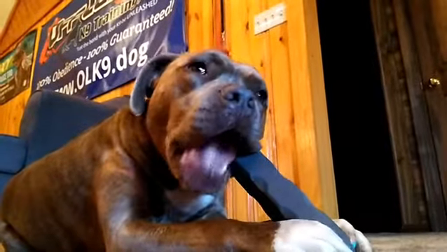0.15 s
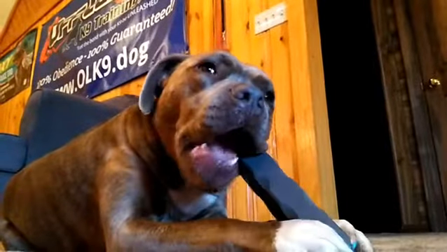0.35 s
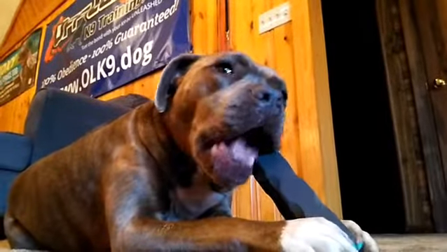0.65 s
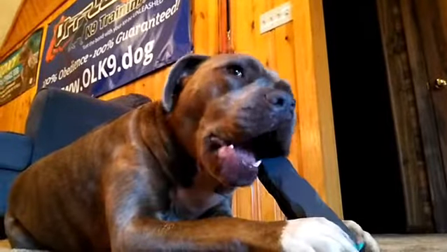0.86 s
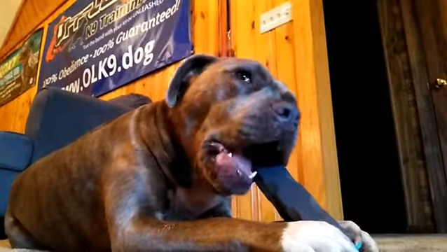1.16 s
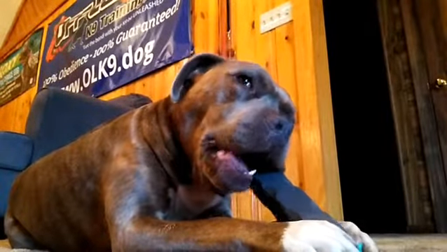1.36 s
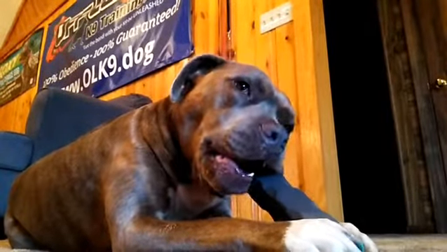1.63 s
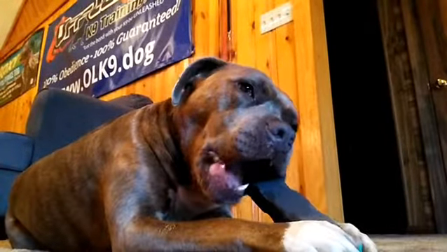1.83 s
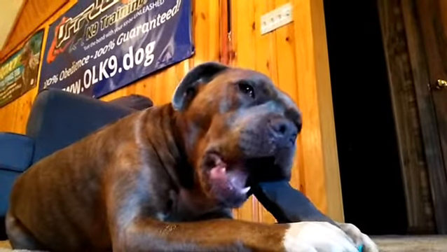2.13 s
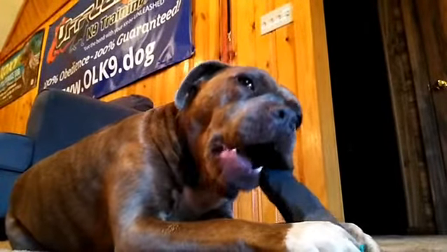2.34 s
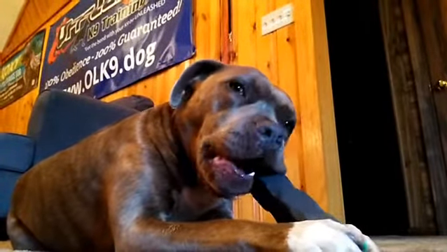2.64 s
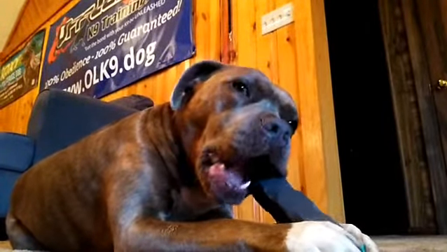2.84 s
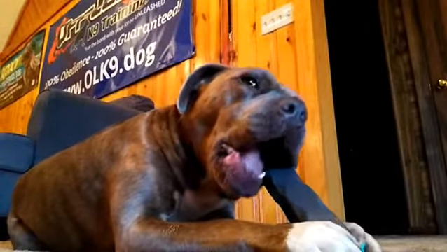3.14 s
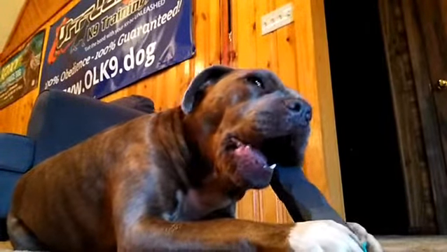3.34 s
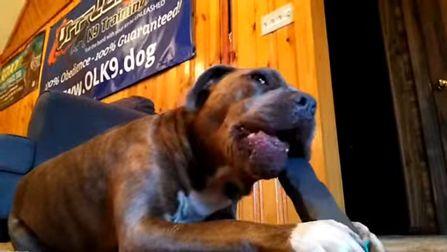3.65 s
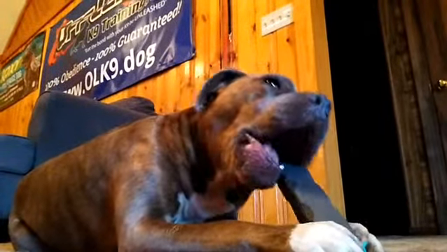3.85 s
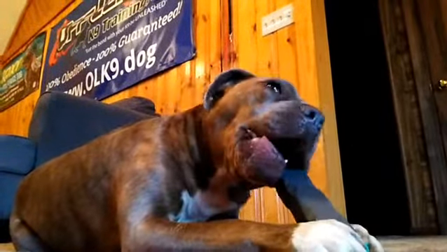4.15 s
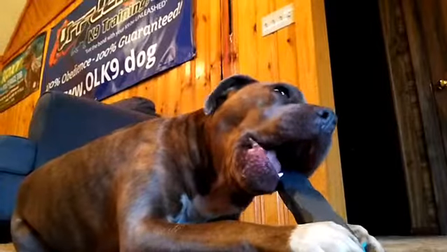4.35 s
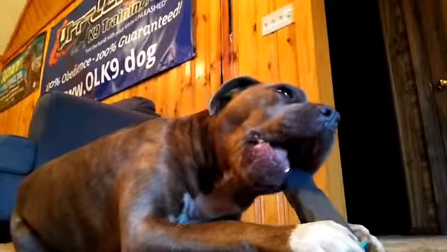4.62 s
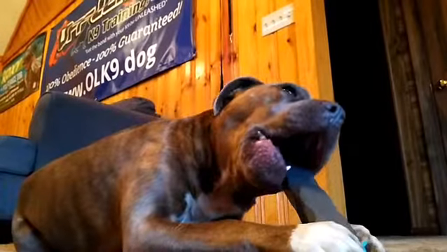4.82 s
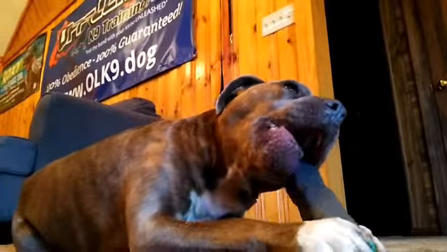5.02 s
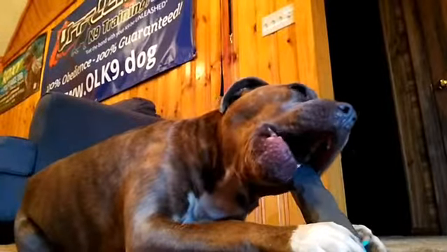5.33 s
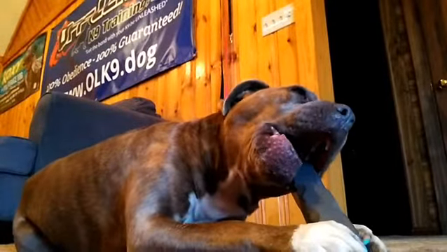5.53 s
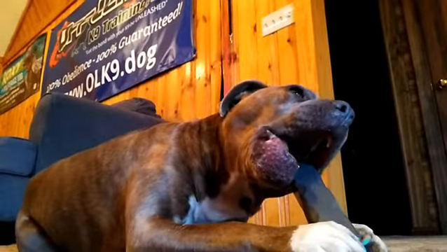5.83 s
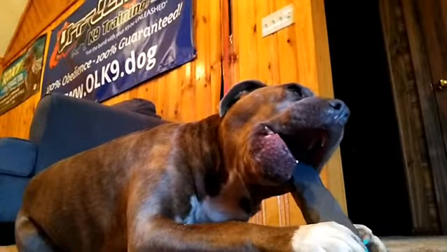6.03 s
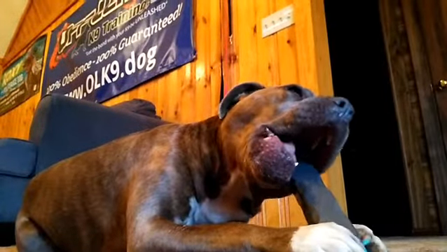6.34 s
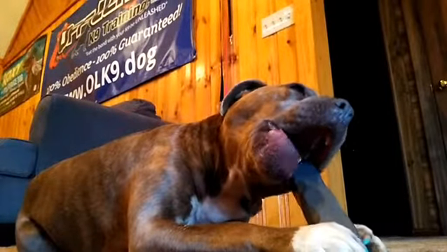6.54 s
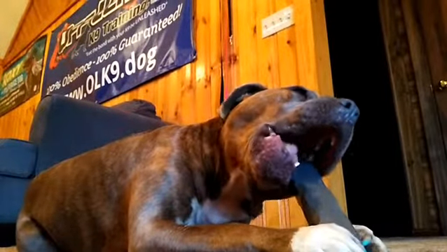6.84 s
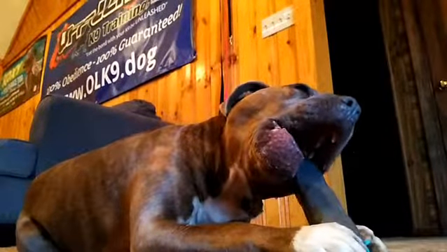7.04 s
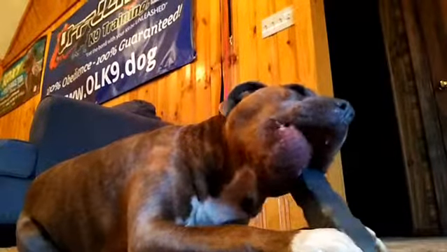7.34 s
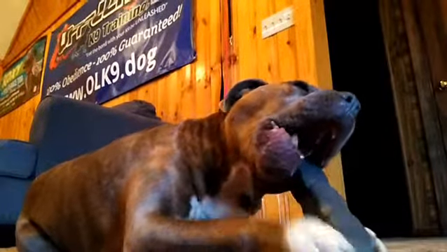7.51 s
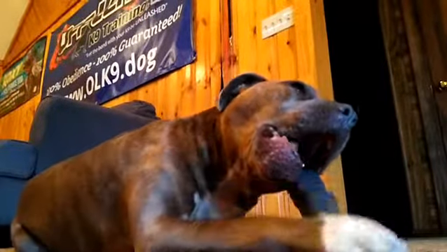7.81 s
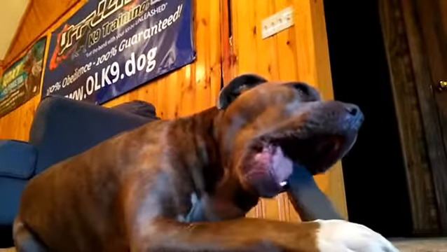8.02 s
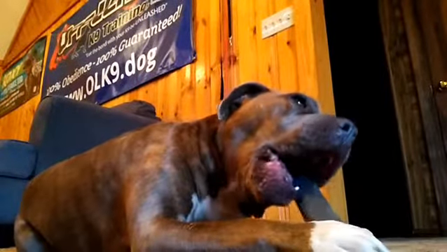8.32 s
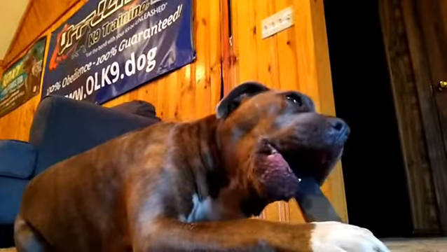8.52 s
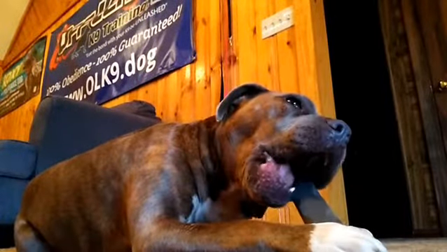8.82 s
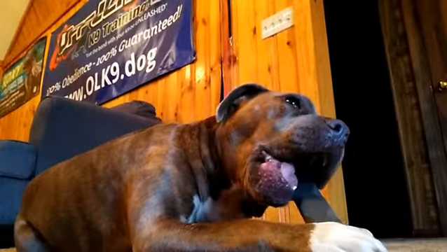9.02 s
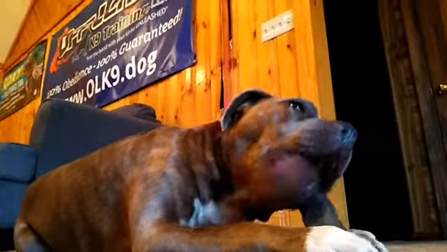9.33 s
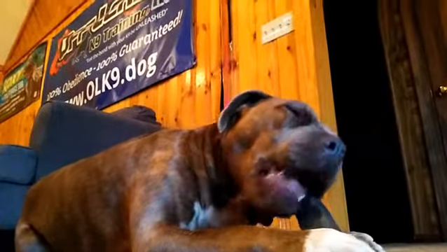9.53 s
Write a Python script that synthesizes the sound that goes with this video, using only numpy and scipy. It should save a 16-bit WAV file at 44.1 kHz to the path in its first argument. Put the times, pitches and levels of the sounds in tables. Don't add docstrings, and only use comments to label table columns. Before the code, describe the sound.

A dog gnaws a hard chew toy up close, teeth clacking, knocking and scraping in irregular bursts over a faint low appliance hum.

```python
import sys
import numpy as np
from scipy import signal
from scipy.fft import rfft, irfft, next_fast_len
from scipy.io import wavfile
from scipy.ndimage import uniform_filter1d

SR = 44100
rng = np.random.default_rng(int(sys.argv[2]) if len(sys.argv) > 2 else 0)


def wav_out(sig):
    wavfile.write(sys.argv[1], SR, np.round(np.clip(np.atleast_2d(sig).T, -1, 1) * 32767).astype(np.int16))


def field_ratio(decibels):
    return 10 ** (np.asarray(decibels, dtype=float) / 20)


N = 426447

PORT_LAG_SAMPLES = 4
TONGUE_PAN_DB = 16.5

# [hz, level_db, t60_s]
CRACK_MODES = [(2950, -6, 0.0031), (3520, 9.5, 0.0062), (3940, -29, 0.0032), (5300, 0, 0.0052),
               (6800, -6, 0.0023)]
# [start_s, level_db]
LIP_TICKS = [(0.4218, -53), (0.625, -52), (1.713, -55), (2.39, -65), (3.336, -55), (3.4092, -55),
             (3.47, -53), (3.6866, -54), (4.3, -56), (4.7885, -47), (4.878, -52), (5.1754, -51.5),
             (5.2869, -56), (5.497, -56), (5.610, -56), (5.84, -53), (6.1843, -64), (6.2464, -56),
             (8.937, -59), (8.995, -59), (9.0998, -52), (9.2767, -59), (9.531, -55), (9.568, -52)]
# [start_s, level_db]
TONGUE_TICKS = [(0.8021, -63), (1.1184, -62), (1.1643, -58), (2.077, -61), (2.3, -54), (2.9654, -61),
                (3.5723, -57), (3.8222, -68), (3.94, -52), (4.114, -54), (4.2752, -61), (5.202, -57),
                (5.3408, -63), (5.415, -55.5), (5.7179, -61), (8.2544, -65), (9.0648, -60), (9.1441, -60)]


def evened(x):
    return x / np.sqrt(np.mean(x ** 2) + 1e-20)


def peak(x):
    return x / (abs(x).max() + 1e-20)


def read(points, hz):
    f, value = np.transpose(points)
    return np.interp(np.log(hz + 1), np.log(f + 1), value)


def smoothed(x, first, second, **axes):
    return uniform_filter1d(uniform_filter1d(x, size=first, **axes), size=second, **axes)


def add(mix, start_s, sound):
    part = mix[:, round(start_s * SR):][:, :sound.shape[1]]
    part += sound[:, :part.shape[1]]


def band_noise(hz, width_hz, channels):
    n = next_fast_len(N)
    bell = 1 / (1 + (2 * (np.fft.rfftfreq(n, 1 / SR) - hz) / width_hz) ** 2)
    return evened(irfft(rfft(rng.standard_normal((channels, n))) * bell, n)[:, :N])


def ring(modes, t, rise_s):
    spot_db, detune = 2.2, 0.022
    total = np.zeros(len(t))
    for hz, level_db, t60_s in modes:
        a, b = rng.standard_normal(2)
        decay = field_ratio(level_db + spot_db * a - 60 * t / t60_s)
        total += decay * np.sin(2 * np.pi * hz * (1 + detune * b) * t)
    return peak(total * (1 - np.exp(-t / rise_s)) ** 2)


def hum():
    # [hz, width_hz, level_db]
    whine = [(58.5, 24, -56.5), (75.7, 17, -58.5), (251.3, 39, -69.5), (568, 110, -72), (818, 19, -66),
             (840, 160, -75.5)]
    motor_hz, motor_db = 58.74, -48.7
    side_hz, side_db = (41.26, 46.0, 53.6), (-68, -66, -59.5)
    mains_hz, mains_db = 120.0 * np.arange(1, 3), (-58, -69)
    blade_hz, blade_db = 273.1 * np.arange(1, 4), (-67, -69.5, -71.5)
    tone_hz = [motor_hz, *side_hz, *mains_hz, *blade_hz]
    level = field_ratio(np.array([motor_db, *side_db, *mains_db, *blade_db]))
    t = (np.arange(N) - np.array([[PORT_LAG_SAMPLES], [0]])) / SR
    tones = sum(np.sqrt(2) * a * np.sin(2 * np.pi * (f * t + rng.random())) for f, a in zip(tone_hz, level))
    lines = sum(field_ratio(db) * band_noise(hz, width_hz, channels=1) for hz, width_hz, db in whine)
    return tones * field_ratio([[-0.3], [0.3]]) + lines * field_ratio([[0.6], [-0.6]])


def air():
    # [hz, level_db_per_hz]
    air_spectrum = [(15, -50), (25, -29), (66, 0.5), (133, -14), (173, -16), (260, -14.5), (445, -20),
                    (552, -21), (703, -25), (826, -28.5), (895, -25), (1080, -35), (2170, -39.5),
                    (4750, -53.5), (15500, -61)]
    # [hz, likeness_0_to_1]
    likeness = [(60, 0.98), (300, 0.86), (800, 0.043), (1500, 0.026), (3000, 0.16), (6000, 0.013)]
    # [time_s, level_db]
    swell = [(0, 0), (1, 3), (1.8, 4), (2.6, 2.5), (4, 2), (4.8, -2), (5.9, 2), (7, -0.5), (8, -1.5),
             (9.67, 0.5)]
    frames, hz = N // 512 + 5, np.fft.rfftfreq(2048, 1 / SR)
    column_hz = hz[:, None]
    a, b, c, d, patches = rng.standard_normal((frames, 1025, 5)).T
    patches = evened(uniform_filter1d(uniform_filter1d(patches, size=20, axis=0), size=8, axis=1))
    same = np.clip(read(likeness, hz), -1, 1)[:, None]
    left, other = a + 1j * b, c + 1j * d
    z = np.array([left, same * left + np.sqrt(1 - same ** 2) * other])
    z *= field_ratio(read(air_spectrum, hz)[:, None] + 3.08 * patches / (1 + column_hz / 2500))
    low = 1 / (1 + (column_hz / 1500.0) ** 2)
    lumps = evened(smoothed(rng.standard_normal(frames), 8, 8))
    swell_db = np.interp(np.arange(frames) * 512 / SR, *np.transpose(swell))
    z *= field_ratio(low * (swell_db + 0.31 * lumps))
    z[0] *= np.exp(-2j * np.pi * low * column_hz * PORT_LAG_SAMPLES / SR)
    return field_ratio(-49) * evened(signal.istft(z, nperseg=2048, noverlap=1536)[1][:, :N])


def rustle():
    # [start_s, length_s, level_db]
    strokes = [(0.02, 0.26, -74.5), (0.115, 0.051, -77), (0.28, 0.065, -79), (0.383, 0.24, -70),
               (0.63, 0.065, -69), (0.875, 0.053, -80), (1.579, .02, -79), (1.691, 0.064, -78),
               (1.855, 0.048, -78), (2.384, 0.064, -68), (3.003, 0.09, -83), (3.451, 0.066, -73),
               (3.51, 0.064, -80), (3.632, 0.029, -83), (3.939, 0.038, -70), (3.998, 0.055, -82),
               (4.409, 0.022, -87), (4.88, 0.047, -68), (5.28, 0.032, -77), (5.714, 0.1, -76.5),
               (5.814, 0.053, -71), (6.175, 0.064, -82), (7.03, 0.075, -82), (7.173, 0.072, -76),
               (8.92, 0.11, -87), (9.093, 0.029, -65), (9.632, 0.058, -84)]
    # [hz, width_hz, level_db]
    hiss_bands = [(6000, 560, -10), (9600, 5700, 3.5), (13700, 3200, -8)]
    fizz_s, fizz_db = 0.1, -31.5
    grain = field_ratio(2.8 * evened(uniform_filter1d(rng.standard_normal(N), size=200)))
    pops = rng.exponential(1, N) * (rng.random(N) < 320 / SR)
    crackle = uniform_filter1d(pops, size=24) * 24
    hiss = sum(field_ratio(db) * band_noise(hz, width_hz, channels=2) for hz, width_hz, db in hiss_bands)
    envelope = np.full((1, N), field_ratio(-88.5))
    for start_s, length_s, level_db in strokes:
        add(envelope, start_s, field_ratio(level_db) * signal.windows.tukey(round(length_s * SR), 0.35)[None])
    fizz = np.exp(-np.arange(SR // 5) / (fizz_s * SR))[None]
    for start_s, level_db in LIP_TICKS + TONGUE_TICKS:
        add(envelope, start_s, field_ratio(level_db + fizz_db) * fizz)
    rub = evened(hiss * grain * (1 + 0.6 * crackle))
    return rub * envelope * field_ratio([[0.3], [-16.0]])


def ticks():
    # [start_s, level_db]
    splinters = [(0.3591, -59), (2.8489, -57), (4.0881, -55), (4.9292, -49), (6.5318, -48), (6.997, -66),
                 (7.1586, -41), (7.4826, -59), (7.6324, -49.5), (8.1035, -62), (8.3905, -46.5),
                 (8.8393, -61), (9.0409, -52), (9.324, -49)]
    # [start_s, level_db]
    further_tongue_ticks = [(.0588, -58), (.3032, -62), (.4125, -59), (1.8696, -63), (3.0515, -62), (3.3947, -58),
                            (3.5458, -65), (3.6416, -62), (4.0168, -61), (5.1452, -65), (5.617, -58), (5.688, -64),
                            (5.7324, -65), (5.8875, -66), (6.4308, -62), (8.975, -63), (9.013, -61), (9.186, -63),
                            (9.3861, -66), (9.6415, -60), (9.663, -53.5)]
    out, t = np.zeros((2, N)), np.arange(400) / SR
    bright = signal.butter(N=2, Wn=[6300, 14000], btype="band", fs=SR, output="sos")
    places = [(LIP_TICKS, 18), (TONGUE_TICKS, TONGUE_PAN_DB), (splinters, -3), (further_tongue_ticks, TONGUE_PAN_DB)]
    for rows, pan_db in places:
        port_db = np.array([[0.4], [-0.6]]) * pan_db
        for start_s, level_db in rows:
            snap = signal.sosfilt(bright, rng.standard_normal((2, len(t))) * np.exp(-t / 0.0013))
            add(out, start_s, field_ratio(level_db - 3.0 + port_db) * snap / abs(snap).max())
    return out


def puffs():
    # [start_s, length_s, hz, level_db]
    nose_puffs = [
        (0.298, 0.13, 6540, -82),
        (1.868, 0.14, 5800, -79),
        (2.368, 0.17, 5100, -74.5),
        (3, .03, 6530, -82),
        (5.133, 0.1, 7000, -84),
        (5.837, 0.054, 5900, -79),
        (6.993, 0.082, 7800, -71),
        (7.473, 0.14, 6800, -79),
        (8.096, 0.06, 6370, -79),
        (9.085, 0.087, 6400, -77),
    ]
    out = np.zeros((2, N))
    for start_s, length_s, hz, level_db in nose_puffs:
        u = np.arange(round(length_s * SR)) / (length_s * SR)
        band = signal.butter(N=3, Wn=[hz * 0.81, hz * 1.15], btype="band", fs=SR, output="sos")
        breath = evened(signal.sosfilt(band, rng.standard_normal((2, 8000))))[:, :len(u)]
        add(out, start_s, field_ratio(level_db + np.array([[-1.5], [5.0]])) * breath * peak(u * np.exp(-u / 0.13)))
    return out


def rings():
    # [start_s, level_db, pitch_hz]
    hollow_knocks = [(0.3274, -49, 520), (0.4282, -40.5, 303), (0.8004, -44, 422), (0.8872, -40, 340),
                     (0.8877, -49, 635), (1.18, -41.5, 430), (1.3601, -46.5, 630), (1.6794, -49, 500),
                     (1.9098, -53, 432), (2.2166, -45, 540), (3.2044, -41.5, 390), (3.2593, -44, 580),
                     (3.4598, -29.5, 540), (3.4778, -43, 384), (3.7891, -46.5, 540), (3.8499, -38.5, 600),
                     (3.9736, -47, 500), (4.4491, -61, 455), (4.929, -34.5, 610), (4.9604, -52, 467),
                     (5.3385, -49, 610), (6.0749, -52, 448), (6.5638, -48, 510), (7.0766, -44, 382),
                     (7.1404, -36, 574), (7.2268, -44, 540), (8.3652, -28, 517), (8.3786, -53, 446),
                     (8.3951, -32, 390), (8.43, -45, 614), (9.3225, -29.5, 540), (9.3998, -44, 405),
                     (2.328, -38.5, 520),
        (2.393, -35, 477),
        (6.5338, -24.5, 556),
        (7.154, -37.5, 390),
    ]
    # [start_s, level_db, pitch_hz]
    toy_rings = [(0.3824, -36.5, 875), (0.4205, -37, 780), (0.4293, -41, 804), (0.8862, -39.5, 890),
                 (1.1806, -35.5, 820), (1.212, -39.5, 820), (1.2405, -31.5, 820), (1.2475, -34.5, 820),
                 (1.9483, -49, 820), (2.187, -36, 894), (2.2177, -39, 804), (2.31, -39, 800),
                 (2.3289, -26.5, 770), (2.3938, -26.5, 760), (2.4138, -42, 804), (3.2055, -38, 820),
                 (3.2164, -30.5, 820), (3.2543, -37.5, 774), (3.3247, -42, 820), (3.4609, -22, 780),
                 (3.4838, -42, 750), (3.4973, -38.5, 860), (3.7911, -41.5, 910), (3.8525, -29, 884),
                 (3.8729, -48, 875), (3.9528, -30, 820), (4.0934, -30.5, 820), (4.1139, -47, 810),
                 (4.4192, -42, 790), (4.4416, -48, 770), (4.4621, -50, 750), (4.948, -45, 786),
                 (4.9585, -47, 820), (4.9694, -36, 740), (4.9849, -37.5, 754), (4.9989, -52, 790),
                 (5.3426, -37.5, 860), (6.5344, -15.5, 794), (6.5703, -50, 840), (6.917, -44, 906),
                 (7.0782, -33.5, 840), (7.141, -33.5, 820), (7.1497, -27, 780), (8.1667, -31.5, 697),
                 (8.1921, -49, 714), (8.3657, -27, 840), (8.3972, -31, 793), (9.2203, -33.5, 840),
                 (9.2896, -36.5, 840), (9.324, -19, 820)]
    # [start_s, level_db, pitch_hz]
    molar_rings = [(0.8857, -47, 1450), (0.9062, -57, 1480), (1.1821, -57, 1570), (2.332, -48, 1390),
                   (2.395, -42.5, 1270), (2.7869, -60, 1320), (3.2167, -50, 1550), (3.2524, -52, 1450),
                   (3.4813, -60, 1590), (3.4955, -52, 1600), (3.7896, -45, 1350), (3.8086, -60, 1460),
                   (3.954, -43, 1390), (3.99, -53, 1350), (4.0909, -38, 1300), (4.1089, -55, 1440),
                   (4.4192, -46, 1380), (4.4394, -51, 1390), (4.4526, -54, 1410), (4.6396, -61, 1510),
                   (4.927, -40, 1370), (4.943, -57, 1370), (4.959, -51, 1200), (4.9778, -48, 1270),
                   (5.3402, -46.5, 1540), (6.5337, -32, 1380), (6.5529, -57, 1590), (6.5623, -62, 1510),
                   (6.9155, -58, 1530), (7.0774, -50, 1340), (7.142, -39.5, 1400), (7.152, -32.5, 1380),
                   (7.1764, -65, 1570), (7.183, -63, 1620), (7.54, -47.5, 1440), (7.5591, -58, 1520),
                   (8.1722, -58, 1550), (8.3656, -33, 1440), (8.3842, -47, 1400), (8.3963, -44, 1300),
                   (8.4056, -54, 1590), (8.4136, -53, 1360), (9.0412, -58.5, 1640), (9.3272, -49, 1550),
                   (9.5081, -64, 1470)]
    # [start_s,
    # level_db, pitch_hz]
    fang_rings = [(0.4198, -58, 1930), (0.4203, -63, 2450), (0.8862, -58.5, 2200), (1.242, -51, 1900),
                  (1.9109, -58, 1940), (2.1907, -52.5, 1960), (2.1917, -55, 1630), (2.2012, -56, 2020),
                  (2.3297, -48.5, 1920), (2.3938, -57, 2200), (3.105, -57, 1700), (3.206, -51, 1650),
                  (3.2164, -45.5, 1900), (3.2575, -50, 1800), (3.46, -45.5, 2160), (3.4973, -55, 2050),
                  (3.79, -56.5, 2530), (3.8504, -65, 1870), (3.9498, -59, 2660), (3.95, -44, 1690),
                  (4.09, -45, 2260), (4.094, -42.5, 1690), (4.1084, -56, 2050), (4.64, -62, 1860),
                  (4.929, -41, 1740), (4.9288, -48, 2250), (4.9814, -62, 2050), (5.198, -61, 1830),
                  (5.3401, -54.5, 2840), (6.523, -63, 2560), (6.5316, -50, 2860), (6.5342, -31.5, 1900),
                  (6.5529, -57, 2000), (6.5663, -52, 1980), (7.143, -50, 2780), (7.15, -52, 2440),
                  (7.1584, -47, 2560), (7.1799, -61, 2840), (7.7543, -62, 2000), (8.173, -67, 2700),
                  (8.3652, -38, 2090), (8.3762, -65, 2390), (8.3767, -62, 1830), (8.39, -44, 2630),
                  (8.3947, -42, 1690), (9.0871, -62, 2780), (9.2193, -48.5, 2250), (9.2207, -50, 1720),
                  (9.2903, -55, 1700), (9.3231, -53, 2430), (9.507, -57, 1920),
                  (3.4612, -39, 1270),
        (3.538, -68, 3700),
        (8.396, -52, 3400),
    ]
    # [start_s, level_db, pitch_hz]
    chip_rings = [(0.4209, -62, 5600), (2.3954, -68, 3420), (2.3975, -58, 3920), (2.4074, -66, 6100),
                  (3.461, -52, 3400), (3.4683, -57, 3900), (3.498, -57, 3640), (3.951, -58, 6000),
                  (3.9519, -53, 3450), (3.9524, -57, 4760), (3.9529, -56, 5300), (3.9848, -58, 5340),
                  (3.9853, -64, 4540), (4.093, -63, 5500), (4.094, -55, 3170), (4.788, -66, 5700),
                  (4.9302, -53, 5330), (4.9302, -51, 3280), (4.9312, -57, 4300), (4.932, -58, 3880),
                  (4.9686, -64, 4610), (5.3424, -61, 4500), (5.3433, -50, 3530), (6.5231, -61, 4520),
                  (6.5326, -62, 6340), (6.532, -50, 5400), (6.5341, -54, 4860), (6.5347, -45, 3320),
                  (6.5348, -40.5, 3960), (6.552, -66, 3340), (6.9182, -57.5, 3830), (7.1447, -61, 3750),
                  (7.1512, -62, 4500), (7.1522, -50, 3530), (7.1606, -49, 5340), (7.1606, -54, 6030),
                  (7.163, -47, 4350), (7.1638, -42, 3530), (7.1664, -45, 4010), (7.168, -53, 5540),
                  (7.172, -51, 3850), (8.365, -67, 5250), (8.3673, -42.5, 4010), (8.3893, -67, 6200),
                  (8.392, -47, 3550), (9.096, -63, 4370), (9.22, -60, 3230), (9.2914, -60, 3420),
                  (9.3232, -56, 4610), (9.3232, -66, 5840), (9.3242, -69, 5400), (9.324, -69, 6300),
                  (9.3247, -39, 3570)]
    # [rise_s, t60_s, left_right_db, level_db, room_share_of_ring_time]
    ring_shapes = [
        (0.0011, 0.017, 3.5, 3.5, 0.4),
        (0.0011, 0.033, 4, -4, 0.59),
        (0.00062, 0.033, 2.5, -1.5, 0.28),
        (0.00027, 0.017, 0, 0, 0.22),
        (0.00035, 0.013, -3.5, -2, 0.18),
    ]
    punch, punch_s = 0.48, 0.0028
    low_lag_s = 0.00053
    sideways_hz = 4600

    near, far, t = np.zeros((2, N)), np.zeros((2, N)), np.arange(2500) / SR

    def envelope(u, rise_s, t60_s):
        onset = (1 - np.exp(-u / rise_s)) ** 2
        return peak((1 + punch * np.exp(-(u / punch_s) ** 2)) * field_ratio(-60 * u / t60_s) * onset)

    parts = [hollow_knocks, toy_rings, molar_rings, fang_rings, chip_rings]
    for rows, (rise_s, t60_s, pan_db, part_db, share) in zip(parts, ring_shapes):
        full, brief = envelope(t, rise_s, t60_s), envelope(t / share, rise_s, t60_s)
        port_db = part_db + np.array([[0.5], [-0.5]]) * pan_db
        for start_s, level_db, hz in rows:
            rough = smoothed(rng.standard_normal((2, len(t))), 50, 37)
            phase = 2 * np.pi * hz * t
            skew = rng.choice([-1, 1]) * hz / sideways_hz * np.array([[1], [-1]])
            tone = field_ratio(level_db + port_db) * (np.sin(phase) + skew * np.cos(phase))
            at_s = start_s + low_lag_s * (hz < 1000)
            add(near, at_s, (1 + 0.2 * evened(rough)) * full * tone)
            add(far, at_s, brief * tone / np.sqrt(share))
    return near, far


def knocks():
    # [hz, level_db, t60_s]
    thump_modes = [(84, -2, 0.067), (114.2, -0.5, 0.14), (182.7, -1.5, 0.067), (336, -5.5, 0.057)]
    # [start_s, level_db, pitch_hz]
    floor_knocks = [(0.334, -43.5, 120), (3.459, -39, 88), (3.949, -35.5, 88), (3.952, -34.5, 286),
                    (4.091, -35, 98), (4.929, -42, 102), (5.3449, -32, 140), (6.535, -26, 108),
                    (6.914, -42.5, 203), (7.079, -37.5, 87), (7.152, -35.5, 94), (7.152, -35.5, 189),
                    (8.37, -34, 111), (8.397, -32.5, 97), (9.215, -39.5, 86)]
    out, t = np.zeros((2, N)), np.arange(8000) / SR
    for start_s, level_db, hz in floor_knocks:
        boom = ring(thump_modes + [(hz, 2.5, 0.08)], t, rise_s=0.0018)
        add(out, start_s, -field_ratio(level_db + 3.5) * boom[None])
    return out


def tooth_modes(hz):
    return [(hz, 0, 0.018), (1400, -9, 0.014), (1720, -7, 0.01), (1950, -2, 0.009), (2400, -7, 0.008)]


def scrapes():
    # [hz, level_db, t60_s]
    toy_modes = [(712, -7, 0.084), (799, 5, 0.099)]
    # [hz, level_db, t60_s]
    hollow_modes = [(540, 25.5, 0.0082)]
    # [start_s, length_s, level_db, tooth_rel_db, tooth_hz]
    drags = [(0.353, 0.13, -60, -10, 1850), (.89, 0.052, -65, -1, 1420), (1.235, 0.026, -50, -11.5, 1860),
             (1.847, 0.11, -59.5, -7.5, 1970), (2.169, 0.17, -57, -13, 1930),
             (3.192, 0.17, -59.5, -8, 1770), (4.416, 0.07, -55, -9, 1450), (4.602, 0.057, -63, -7, 1750),
             (4.94, 0.064, -54.5, -2.5, 1300), (3.947, 0.0072, -45.5, -19, 1380),
             (4.086, 0.0069, -44.5, -7, 1690), (6.521, 0.013, -43.5, -1, 1520),
             (7.137, 0.0077, -44, -18, 1530), (7.543, 0.048, -69, 5, 1520), (8.37, 0.026, -48.5, -6, 1370),
             (9.33, 0.14, -61.5, -29, 1390)]
    out, t = np.zeros((2, N)), np.arange(1500) / SR
    grit_modes = [(hz, mode_db - 15, t60_s) for hz, mode_db, t60_s in CRACK_MODES[:3]]
    for start_s, length_s, level_db, tooth_db, tooth_hz in drags:
        n = round(length_s * SR)
        size, place = rng.standard_normal((2, 8000))[:, :n]
        slips = size * (abs(place) < 0.045) * signal.windows.tukey(n, 0.4)
        body = ring(toy_modes + hollow_modes, t, rise_s=0.0019)
        tooth = ring(tooth_modes(tooth_hz) + grit_modes, t, rise_s=0.00012)
        stroke = evened(np.convolve(slips, body + field_ratio(tooth_db) * tooth))
        add(out, start_s, field_ratio(level_db + np.array([[1.4], [-1.4]])) * stroke)
    return out


def chips(rate_hz, length_s):
    t = np.arange(3000) / SR
    size, place = rng.standard_normal((2, len(t)))
    return size * (abs(place) < rate_hz / SR) * t / length_s * np.exp(-t / length_s)


def bites():
    # [start_s, level_db]
    crunches = [(.421, -51), (.887, -50), (1.241, -59), (2.394, -47), (3.461, -40), (3.497, -54),
                (3.539, -51), (3.952, -42), (3.985, -52), (4.09, -48.5), (4.929, -37), (4.97, -59),
                (5.339, -44), (6.534, -31), (6.916, -51.5), (7.142, -46), (7.151, -36), (7.157, -27.5),
                (7.162, -44), (7.17, -50), (7.219, -50), (8.366, -34.5), (8.389, -40), (8.396, -48),
                (9.219, -51), (9.322, -32)]
    crunch_db, snap_db, snap_s = -12, -9, 0.0031
    out, t = np.zeros((2, N)), np.arange(3000) / SR
    broad = signal.butter(N=2, Wn=[900, 3200], btype="band", fs=SR, output="sos")
    port_db = np.array([[-1.4], [0.6]])
    for start_s, level_db in crunches:
        grit = ring(CRACK_MODES, t[:600], rise_s=0.0001)
        shared, left, right = (np.convolve(chips(9800, 0.00086), grit)[:len(t)] for _ in range(3))
        crack = peak(shared + 3.1 * np.array([left, right]))
        snap = signal.sosfilt(broad, rng.standard_normal(len(t)) * t * np.exp(-t / snap_s))
        add(out, start_s, field_ratio(level_db + snap_db) * peak(snap)[None])
        add(out, start_s - 0.001, field_ratio(level_db + crunch_db + port_db) * crack)
    return out


def room(x):
    # [hz, t60_s, level_db]
    room_bands = [(99, 0.038, -3), (820, 0.31, -11.5), (1520, 0.54, -12.5), (2490, 0.39, -8),
                  (4100, 0.47, -13.5), (7000, 0.45, -12.5)]
    taps = np.zeros((2, SR // 2))
    at = np.arange(300, SR // 2 - 20, 20)
    at = at + rng.integers(0, 20, (2, len(at)))
    np.put_along_axis(taps, at, rng.choice([-1., 1.], at.shape), 1)
    hz, t, z = signal.stft(taps, SR, nperseg=256)
    t60_s, level_db = (read(np.array(room_bands)[:, [0, k]], hz)[:, None] for k in (1, 2))
    decay = field_ratio(-60 * t / t60_s)
    decay = decay / np.linalg.norm(decay, axis=1, keepdims=True) / np.sqrt(128 / 20)
    echoes = signal.istft(z * decay * field_ratio(level_db), SR, nperseg=256)[1]
    return signal.fftconvolve(x, echoes, axes=1)[:, :N]


def scene():
    chew = bites() + knocks() + scrapes()
    chew = chew - 0.98 * signal.lfilter(*signal.iirpeak(1110.0, 4.5, fs=SR), chew)
    direct, spread = rings()
    near = direct + np.array([chew[0], np.roll(chew[1], PORT_LAG_SAMPLES // 2)])
    return near + room(chew + spread) + ticks() + rustle() + puffs() + hum() + air()


def roll_off(x):
    return signal.sosfilt(signal.butter(12, 16310, fs=SR, output="sos"), x)


def record(dry):
    low_cut = signal.butter(N=3, Wn=40.0, btype="high", fs=SR, output="sos")
    top_cut = signal.firwin(1023, 15700, fs=SR)
    heard = signal.oaconvolve(signal.sosfilt(low_cut, dry), top_cut[None], "same")
    return roll_off(heard)


dry = scene()
out = record(dry)
wav_out(out)
```